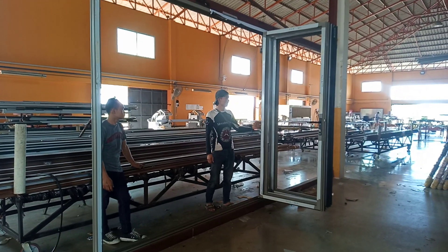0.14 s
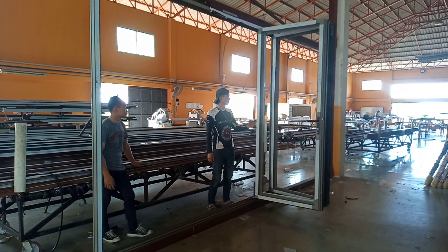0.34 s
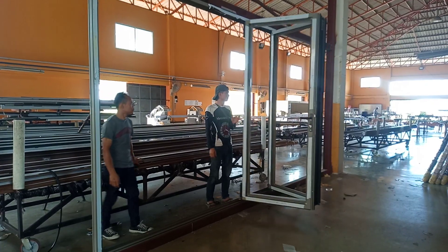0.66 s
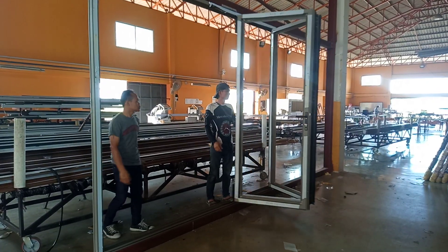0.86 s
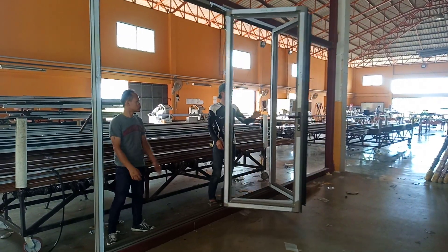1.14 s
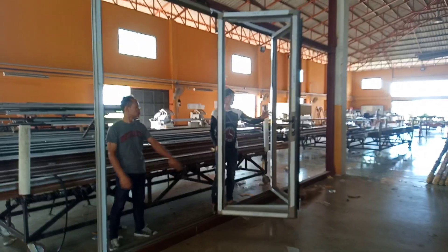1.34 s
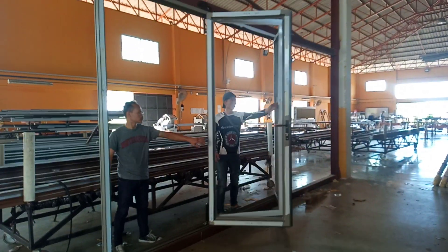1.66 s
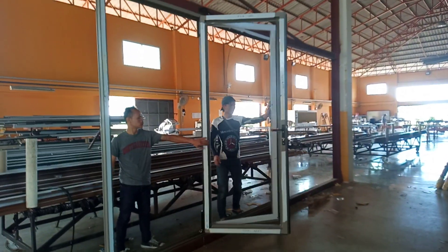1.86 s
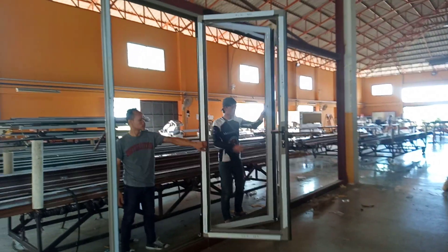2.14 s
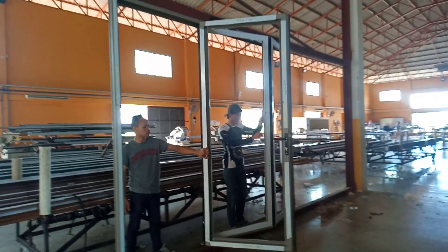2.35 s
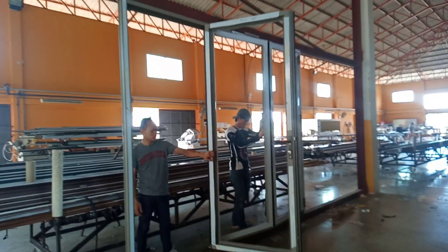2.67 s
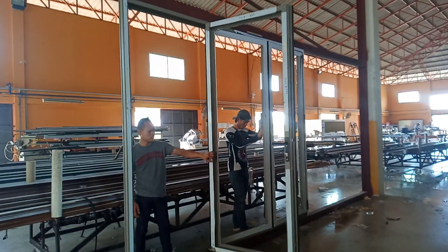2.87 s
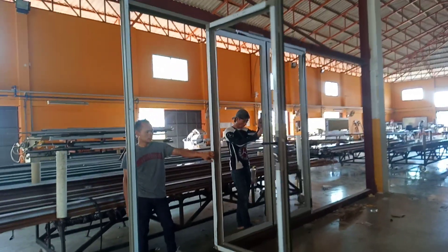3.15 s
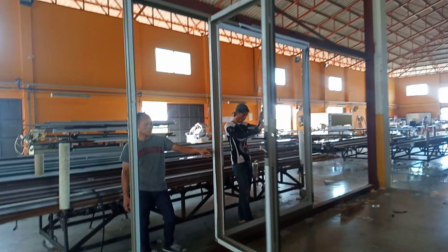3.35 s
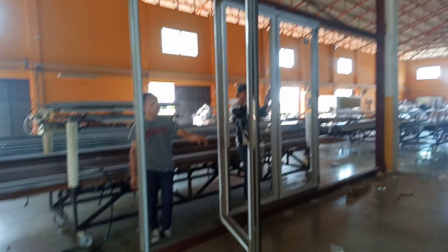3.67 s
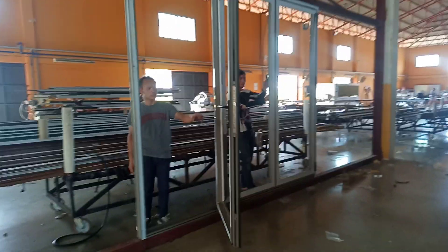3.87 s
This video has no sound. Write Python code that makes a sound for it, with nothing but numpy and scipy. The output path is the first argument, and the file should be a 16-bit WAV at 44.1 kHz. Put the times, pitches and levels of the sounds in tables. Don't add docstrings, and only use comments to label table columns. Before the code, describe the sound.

Hollow metal door frames roll with a clattering rumble and sharp hinge snaps, fall quiet, then roll briefly into a hard ringing bang and small settling knocks, in a large hall, heard through a dull mono phone microphone.

```python
import sys
import numpy as np
from scipy import signal
from scipy.io import wavfile
from scipy.ndimage import uniform_filter1d

SR = 44100
rng = np.random.default_rng(int(sys.argv[2]) if len(sys.argv) > 2 else 0)


def master_out(mix):
    frames = np.transpose(np.atleast_2d(mix))
    ceiling = np.clip(frames, -1, 1)
    pcm = np.round(ceiling * 32767).astype(np.int16)
    wavfile.write(sys.argv[1], SR, pcm)


def boost(x):
    u = np.asarray(x, float) / 20
    return 10 ** u


N = 176400

# [f/Hz, level/dB]
WASH_COLOUR = [(30, -33), (90, -14.5), (200, -1.5), (300, -8), (1000, -13), (4000, -14.5), (6500, -22),
               (7600, -44.5), (9000, -56.5)]
# [f/Hz, t60/s]
HALL_DECAY = [(100, 0.66), (400, 0.99), (1000, 0.86), (2500, 0.67), (5000, 0.36), (8000, 0.45)]

# [t/s, hinge hiss level/dB]
DRIFT_LEVEL = [
    (2.62, -80),
    (2.7, -67.5),
    (2.88, -65),
    (3.0, -69),
    (3.27, -74),
]
# [f/Hz, level/dB]
HINGE_COLOUR = [(100, -4), (400, -7.5), (2000, -7.5), (3900, -3), (4600, -8), (6600, -13.5), (8000, -36.5)]

# [t/s, level/dB, length/s]
PIN_SQUEAKS = [
    (2.234, -60.5, 0.013),
    (2.248, -56.5, 0.019),
    (2.274, -62.5, .05),
    (2.35, -67, 0.04),
    (2.4, -79, 0.096),
]
# [f/Hz, width/Hz, level/dB]
PIN_MODES = [(3330, 60, -20), (3830, 44, -5), (4000, 35, 4.5), (4480, 25, -1), (4510, 7, 3)]

# [t/s, level/dB]
METAL_SNAPS = [
    (1.145, -36),
    (1.2173, -31.5),
    (1.8132, -50),
]
# [t/s, level/dB, f/Hz, length/s, spread/0-1]
HINGE_CHINKS = [(0.061, -58.5, 400, 0.059, 0.4), (0.088, -57, 2010, 0.0093, 0),
                (0.118, -46, 335, 0.037, 0.53), (0.123, -44, 3600, 0.027, 0.07),
                (0.123, -46.5, 2660, 0.012, 0.04), (0.39, -51, 3400, .015, 0),
                (0.484, -53.5, 5320, 0.063, 0), (0.495, -44, 4580, 0.019, 0.08),
                (0.494, -42.5, 3960, 0.021, 0.03), (0.535, -46.5, 4520, 0.054, 0.1),
                (.59, -55, 5270, .03, 0.01), (0.586, -66, 5870, 0.03, 0.04),
                (1.137, -44, 2680, 0.0032, 0.15), (1.143, -35, 2740, 0.014, 0.02),
                (1.146, -55.5, 5170, 0.029, 0.02), (1.172, -41, 2960, 0.017, 0.14),
                (1.212, -36.5, 2630, 0.018, 0.03), (1.216, -36.5, 850, 0.004, 0.18),
                (1.207, -40.5, 3790, 0.023, 0.08), (1.247, -47, 2560, 0.02, 0.2),
                (1.263, -52, 2537, 0.1, 0)]
# [t/s, level/dB, f/Hz, length/s, spread/0-1]
TUBE_BOOMS = [(0.413, -48.5, 680, 0.061, 0.01), (0.444, -54.5, 457, 0.078, 0.03),
              (0.479, -46.5, 1072, 0.12, 0.07), (0.738, -53.5, 203, 0.036, .1),
              (0.764, -49, 680, 0.078, .06), (0.803, -49.5, 1007, 0.061, 0.05),
              (0.907, -44.5, 913, .06, 0.02), (0.993, -46.5, 479, 0.047, 0.17),
              (1.037, -45.5, 1120, 0.03, 0.01), (1.13, -49.5, 710, 0.1, 0), (1.192, -47.5, 185, 0.035, .05),
              (1.195, -45.5, 425, .04, .12), (1.34, -51.5, 193, 0.051, 0.07), (1.372, -52.5, 437, 0.08, 0),
              (1.493, -60.5, 224, .14, 0)]
# [t/s, level/dB, f/Hz, length/s, spread/0-1]
SETTLING_TICKS = [(1.81, -53, 1175, 0.011, 0.11), (1.814, -56.5, 1690, 0.0086, 0.16),
                  (1.809, -63.5, 3130, 0.011, 0.04), (2.29, -75, 4900, .035, 0),
                  (2.729, -66, 3800, 0.013, 0.05), (2.764, -65.5, 3260, 0.0079, 0.55),
                  (2.846, -63.5, 2484, 0.03, 0.33), (2.847, -56.5, 3920, 0.01, 0.1),
                  (2.86, -63.5, 4000, 0.029, 0.04), (3.162, -69.5, 984, .05, 0.04),
                  (3.356, -49, 680, 0.057, 0), (3.678, -61, 165, 0.062, 0.14),
                  (3.727, -46, 880, 0.045, 0.07), (3.74, -45, 420, 0.046, 0.08),
                  (3.807, -51, 478, 0.065, 0), (3.869, -59, 450, 0.021, 0.14),
                  (3.893, -60, 440, 0.031, 0.06), (3.975, -58.5, 994, 0.037, 0.01)]
# [f/Hz, level/dB]
TICK_COLOUR = [(300, -21), (900, 17), (4000, 2.5), (6500, -12.5), (8000, -52.5)]

# [t/s, crack level/dB, thud level/dB]
SLAM_BLOWS = [
    (3.445, -33, -39),
    (3.449, -25.5, -32.5),
    (3.458, -24.5, -32),
    (3.463, -25.5, -28),
    (3.471, -38.5, -27),
    (3.483, -32, -28.5),
    (3.495, -36.5, -31.5),
    (3.531, -38, -29.5),
    (3.549, -45, -30),
    (3.588, -50, -33),
]
# [f/Hz, level/dB]
CRACK_COLOUR = [(90, -26), (170, 1.5), (600, -1), (1800, -4.5), (2300, 0), (3700, 0.5), (4300, -8),
                (5700, -7), (6300, -19), (6900, -12), (8100, -38.5)]
# [f/Hz, level/dB, t60/s]
FRAME_MODES = [(2262, -4, 0.45), (2370, -10, 0.62), (2700, -20, .3), (3160, -7, .4), (3220, -1.5, 0.31),
               (3820, -13, 0.5), (3677, -3, .12), (3900, -17, .4), (4500, -22, .3), (4930, -13, .3),
               (5750, -17, .3), (6840, -10, 0.25)]
# [f/Hz, level/dB, t60/s]
LEAF_MODES = [(178.8, 4, 0.3), (313, -8.5, 0.28), (427, -6.5, 0.4), (494, 4, 0.26), (543, -8.5, 0.19),
              (680, 3.5, 0.099), (804, -2.5, .25), (881, -1, 0.72), (917, -12, .2), (1085, -19, 0.17),
              (1243, -16, .4), (1360, -18, 0.11)]

# [t/s, roller load level/dB, track hiss over load/dB, fine air over load/dB]
FIRST_PULL = [(0, -63, -13, -16.5), (.088, -71.5, 3, -5), (.097, -50, 4.5, -5), (.224, -46, 0, -8.5),
              (.398, -46, -4.5, -10), (.45, -39.5, -6, -24), (.474, -42.5, -7, -18),
              (.51, -41.5, -2, -23.5), (.708, -41, -3.5, -16), (.834, -40, -5, -21.5), (1.04, -43, -5, -20),
              (1.124, -42.5, -7.5, -22.5), (1.25, -43, -4.5, -18.5), (1.4, -45.5, -7, -18.5),
              (1.48, -47.5, -6, -17.5), (1.55, -57.5, 3, -7.5), (1.65, -66, 2.5, -6), (1.95, -72, -4, -21)]
# [t/s, load level/dB, hiss over load/dB, air over load/dB]
SECOND_PULL = [
    (3.266, -57, -22, -17),
    (3.275, -54.5, 1.5, -15),
    (3.33, -40, -14.5, -28),
    (3.44, -40.5, -12.5, -26),
    (3.7, -53.5, 2.5, -11),
    (3.78, -55, -5.5, -13.5),
    (3.93, -66.5, 0, -5),
    (4, -67, 0, -5),
]
# [f/Hz, level/dB]
FIRST_RUMBLE = [(60, -31.5), (140, -16.5), (200, -7), (350, -7.5), (700, -0.5), (1050, 1.5), (1350, -5.5),
                (2000, -4), (3000, -70)]
SECOND_RUMBLE = [(60, -35), (175, 4.5), (400, -2), (900, -12), (1300, -17), (2000, -39), (3000, -57.5)]
# [f/Hz, width/Hz, level/dB]
FIRST_TUBES = [(195, 54, -1), (444, 82, 9), (680, 56, 10), (830, 28, -7), (980, 120, 10), (1075, 17, -2)]
SECOND_TUBES = [(185, 15, 1.5), (419, 54, 4), (438, 15, -14.5), (680, 23, -1.5), (877, 13, 1),
                (1040, 34, -13)]
# [f/Hz, level/dB]
FIRST_HISS = [(800, -19.5), (1400, 1), (1870, 3), (2750, 5.5), (4100, 3.5), (4500, -4), (6000, -20),
              (7200, -60.5)]
SECOND_HISS = [(900, -24), (1800, 7), (3000, 1), (3900, 6), (4400, -6.5), (5700, -9), (7000, -61.5)]
# [f/Hz, level/dB]
AIR_COLOUR = [(3500, -27.5), (4600, 6), (5500, 4.5), (6600, -1.5), (7500, -17), (9000, -53.5)]


def evened(x):
    return x / np.sqrt(np.mean(x ** 2) + 1e-20)


def read(points, hz):
    f, value = np.transpose(points)
    return np.interp(np.log(hz + 1), np.log(f + 1), value)


def colour(x, points):
    log_gain = read(points, np.fft.rfftfreq(4096, 1 / SR)) * np.log(10) / 20
    log_gain[[0, -1]] = min(log_gain)
    full = signal.hilbert(np.r_[log_gain, log_gain[-2:0:-1]])
    response = np.fft.ifft(np.exp(np.conj(full))).real[:2048]
    return signal.oaconvolve(x, response)[:len(x)]


def resonate(x, hz, width):
    r = np.exp(-np.pi * width / SR)
    return 2 * signal.lfilter([1 - r], [1, -r * np.exp(2j * np.pi * hz / SR)], x).real


def slow(span_s):
    size = max(int(span_s * SR), 2)
    once = uniform_filter1d(rng.standard_normal(N), size)
    return evened(uniform_filter1d(once, size))


def curve(times, levels_db):
    return boost(np.interp(np.arange(N) / SR, times, levels_db, -200, -200))


def grit(per_s, spread_db):
    size = boost(spread_db * np.minimum(rng.exponential(1, N), 4))
    size = size * rng.choice([-1, 1], N)
    return evened(size * (rng.random(N) < per_s / SR))


def burst(start, length, level_db, t60, size=N):
    t = np.arange(size) / SR - start
    return np.clip(t / 0.0032, 0, 1) * boost(level_db - 60 * np.clip(t - length, 0, 9) / t60)


def wash():
    return boost(-69.5 + slow(0.24)) * evened(colour(rng.standard_normal(N), WASH_COLOUR))


def hall(x):
    starts = np.arange(300, SR - 20, 20)
    taps = np.zeros(SR)
    taps[starts + rng.integers(0, 20, len(starts))] = rng.choice([-1., 1.], len(starts))
    hz, t, z = signal.stft(taps, SR, nperseg=256)
    fade = boost(-60 * t / read(HALL_DECAY, hz)[:, None])
    tail = signal.istft(z * fade, SR, nperseg=256)[1]
    return signal.fftconvolve(x, tail / np.linalg.norm(tail))[:N]


def drift():
    rub = grit(5000, 2.2) * boost(2 * slow(0.013))
    times, levels = np.transpose(DRIFT_LEVEL)
    return evened(colour(rub, HINGE_COLOUR)) * curve(times, levels)


def squeak():
    slips = sum(burst(s, length, db, 0.042) for s, db, length in PIN_SQUEAKS)
    drive = resonate(grit(6000, 1.5), 4200, 2500) * slips
    return sum(boost(db + 16) * resonate(drive, hz, width) for hz, width, db in PIN_MODES)


def snaps():
    hits = np.zeros(N)
    for s, db in METAL_SNAPS:
        hits[round(s * SR)] = boost(db)
    out = np.zeros(N)
    for hz in (950, 2700, 3800):
        twice = resonate(resonate(hits, hz, hz / 2), hz, hz / 2)
        out += 2 * twice / np.sqrt(hz / SR)
    return out


def chinks():
    out = np.zeros(N)
    rattle = grit(4000, 1.5)
    tick = evened(colour(rattle, TICK_COLOUR))
    lead = 900
    for s, db, hz, length, spread in [*HINGE_CHINKS, *TUBE_BOOMS, *SETTLING_TICKS]:
        a, b = round(s * SR), min(round((s + length + .2) * SR), N)
        width_hz = 50 + .4 * spread * hz
        ring = np.zeros(b - a)
        for f in hz * 2 ** ((spread + .035) * np.linspace(-1, 1, num=5)):
            once = resonate(rattle[a - lead:b], f, width_hz)
            ring += resonate(once, f, 2 * width_hz)[lead:]
        ring = ring / np.std(ring[:round(length * SR)])
        if hz > 2000:
            ring = ring + boost(-11) * tick[a:b]
        out[a:b] += ring * burst(0, length, db, 0.04, size=b - a)
    return out


def slam():
    noise = rng.standard_normal(N)
    crack = noise * sum(burst(s, 0.003, db, 0.038) for s, db, _ in SLAM_BLOWS)
    thud = noise * sum(burst(s, 0.0047, db, 0.035) for s, _, db in SLAM_BLOWS)
    ring = np.zeros(N)
    for drive, modes in ((crack, FRAME_MODES), (thud, LEAF_MODES)):
        for hz, db, t60 in modes:
            ring += boost(db) * np.sqrt(t60) * resonate(drive, hz, 5.5 / t60)
    unit = np.linalg.norm(colour(np.eye(1, 2048)[0], CRACK_COLOUR))
    return colour(crack, CRACK_COLOUR) / unit + boost(21.5) * ring


def flutter(x):
    out = x.copy()
    for hz in (1700, 2400, 3200, 4000, 5000):
        out += (boost(2.2 * slow(.02) - 1) - 1) * resonate(x, hz, 600)
    return out


def track_hiss(shape):
    return evened(colour(grit(6000, 1.5) * boost(.9 * slow(.015)), shape))


def rollers(table, body, tubes, track, ring_db):
    times, load, hiss, air = np.transpose(table)
    late_s = np.clip(np.arange(N) / SR - times[0], 0, 1.5) - .9
    darken_db = 6.5
    shake = grit(2000, 1.9) * boost(0.67 * slow(0.016))
    ring = np.zeros(N)
    for hz, width, db in tubes:
        level_db = db + 2.5 * slow(0.013) - darken_db * np.log2(hz / 700) * late_s
        ring += boost(level_db) * evened(resonate(shake, hz, width))
    broad = evened(colour(shake, body))
    broad += (boost(darken_db * late_s) - 1) * resonate(broad, 250, 290)
    low_pass = signal.butter(4, 3000, fs=SR, output="sos")
    rumble = evened(signal.sosfilt(low_pass, broad + boost(ring_db) * evened(ring)))
    out = rumble * curve(times, load)
    out += track_hiss(track) * curve(times, load + hiss)
    return out + track_hiss(AIR_COLOUR) * curve(times, load + air)


def scene():
    first = rollers(FIRST_PULL, FIRST_RUMBLE, FIRST_TUBES, FIRST_HISS, ring_db=-6)
    second = rollers(SECOND_PULL, SECOND_RUMBLE, SECOND_TUBES, SECOND_HISS, ring_db=-7)
    rolling = first + second + drift()
    small = chinks() + squeak() + snaps()
    bang = slam()
    room = hall(boost(-8) * rolling + boost(-8.5) * small + boost(-4) * bang)
    door = flutter(rolling) + small + bang + room
    bass_cut = signal.butter(3, 105, "high", fs=SR, output="sos")
    mix = signal.sosfilt(bass_cut, door) + wash()
    return np.array([mix, mix])


def band_limit(x):
    return signal.sosfilt(signal.butter(12, 8070, fs=SR, output="sos"), x)


def record(dry):
    limited = .2 * np.tanh(dry / .2)
    thin = signal.lfilter(*signal.butter(1, 30, "high", fs=SR), limited)
    band = signal.firwin(201, 7530, window=("kaiser", 8), fs=SR)
    narrow = signal.oaconvolve(thin, band[None], "same")
    return band_limit(narrow)


dry = scene()
out = record(dry)
master_out(out)
```